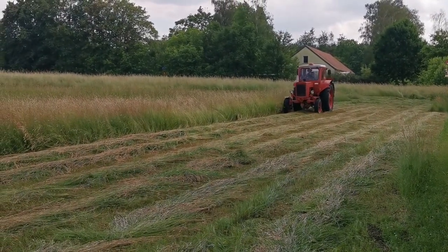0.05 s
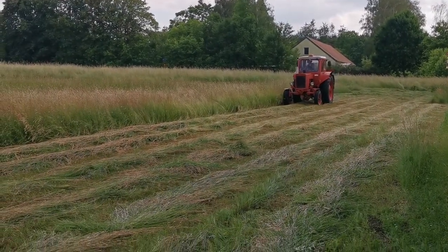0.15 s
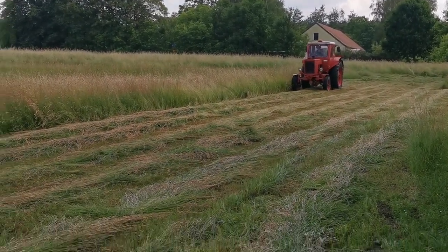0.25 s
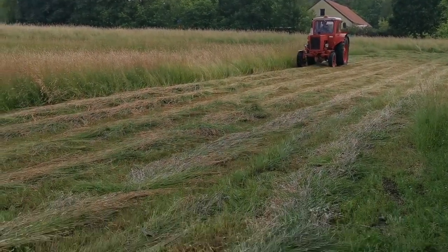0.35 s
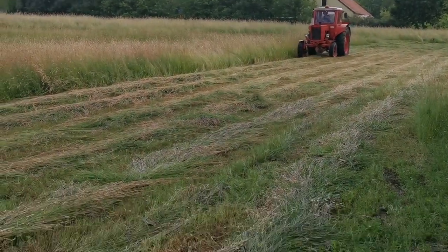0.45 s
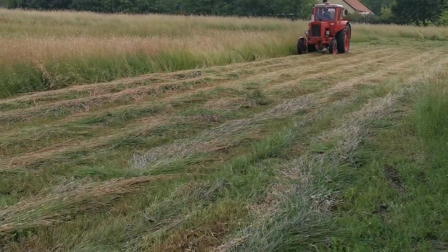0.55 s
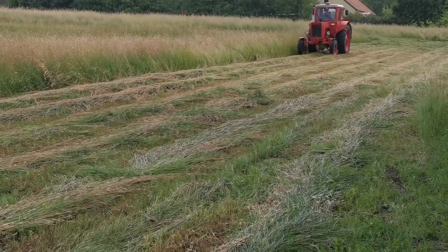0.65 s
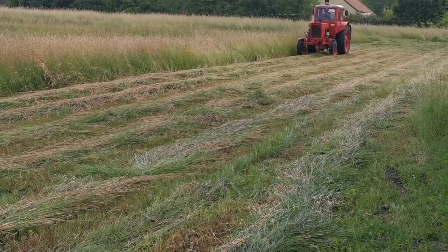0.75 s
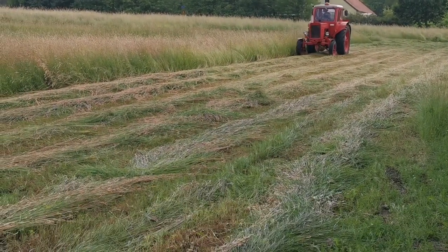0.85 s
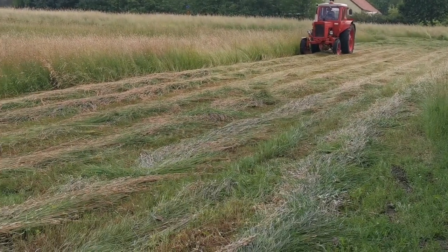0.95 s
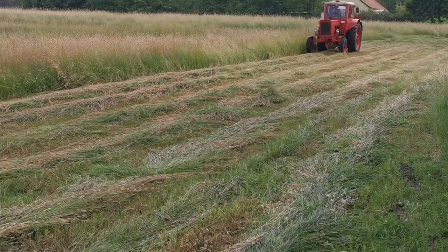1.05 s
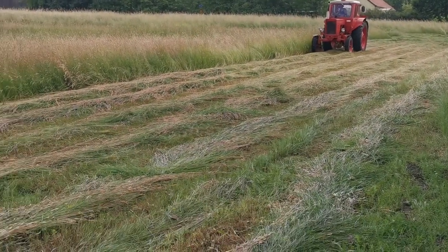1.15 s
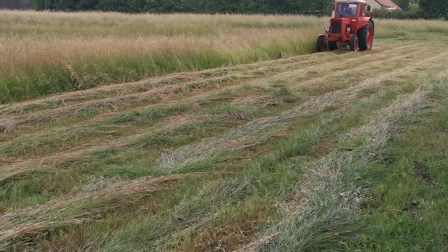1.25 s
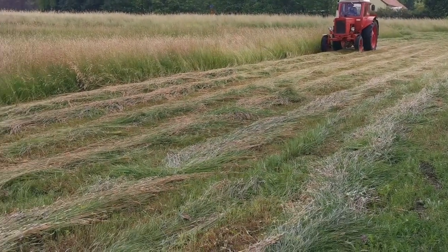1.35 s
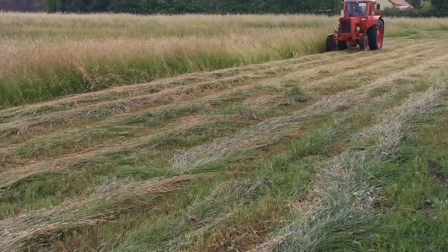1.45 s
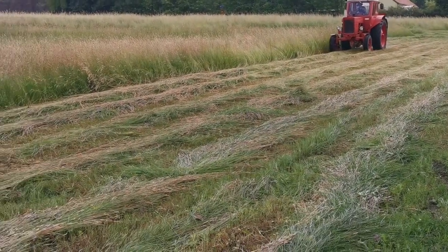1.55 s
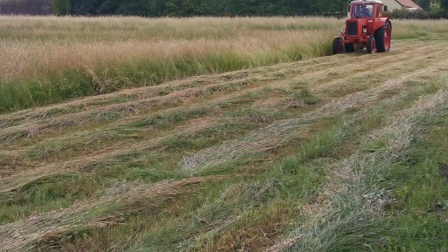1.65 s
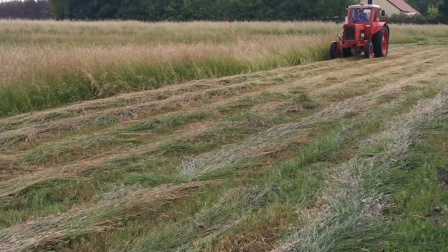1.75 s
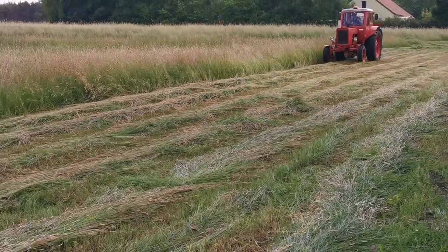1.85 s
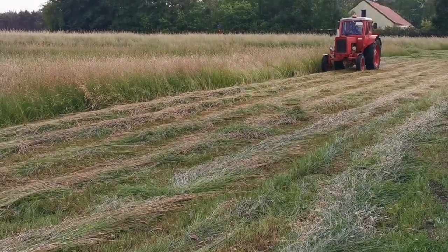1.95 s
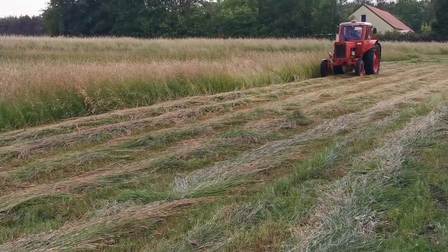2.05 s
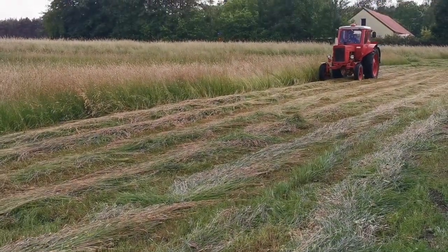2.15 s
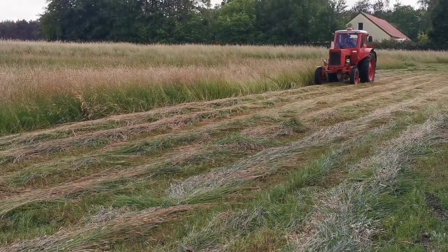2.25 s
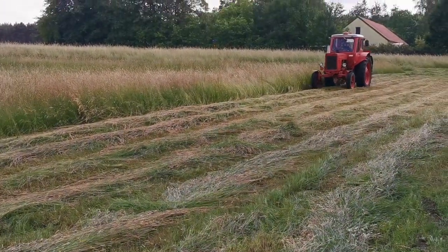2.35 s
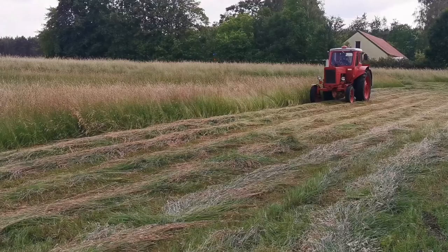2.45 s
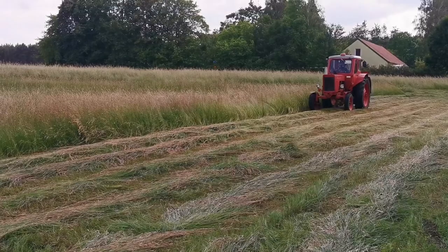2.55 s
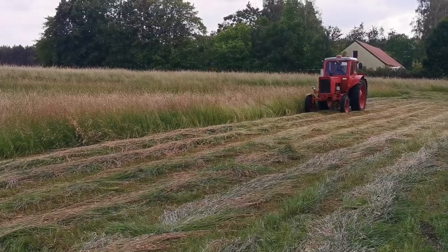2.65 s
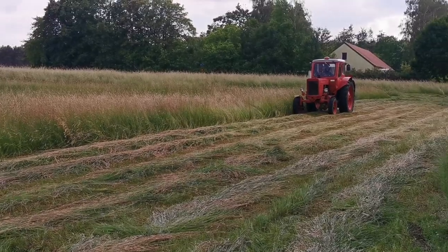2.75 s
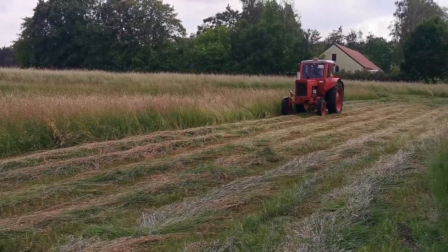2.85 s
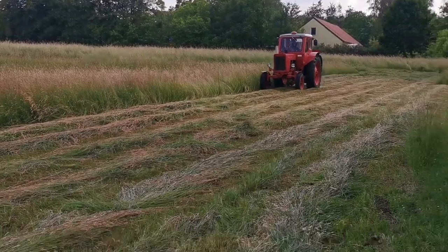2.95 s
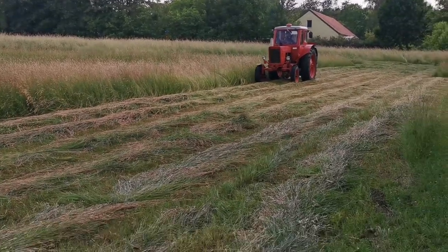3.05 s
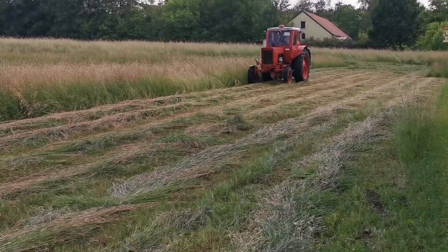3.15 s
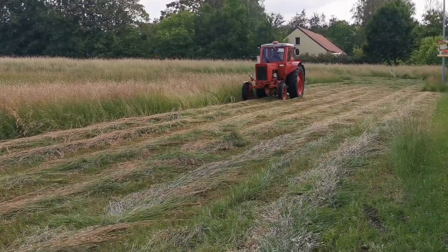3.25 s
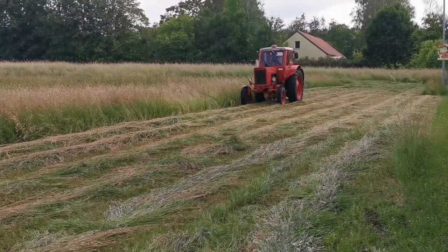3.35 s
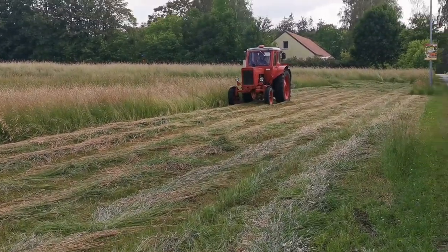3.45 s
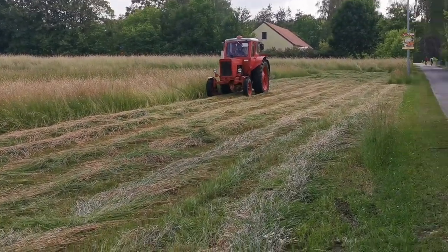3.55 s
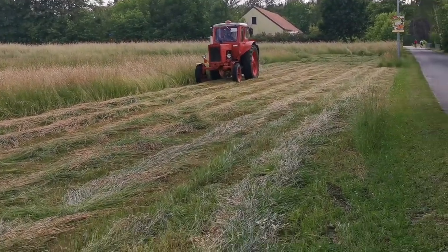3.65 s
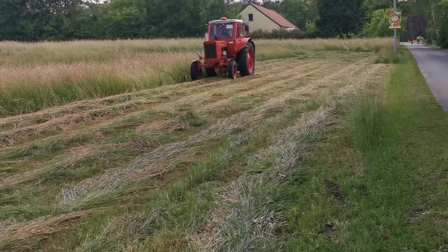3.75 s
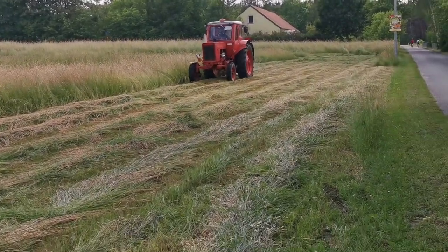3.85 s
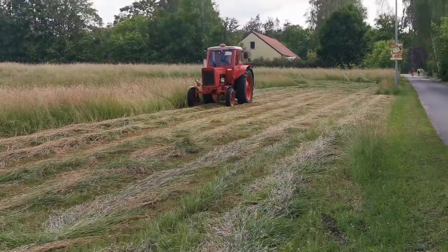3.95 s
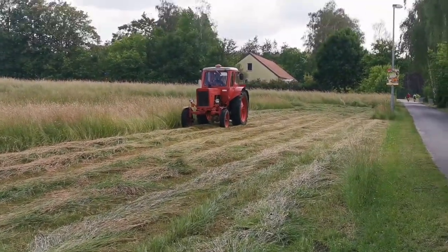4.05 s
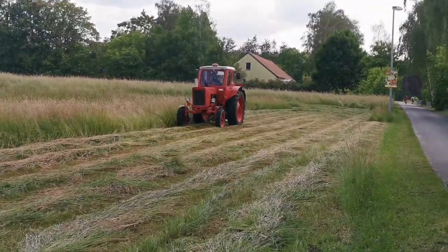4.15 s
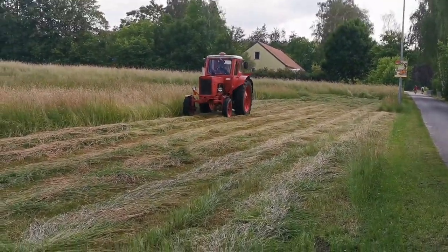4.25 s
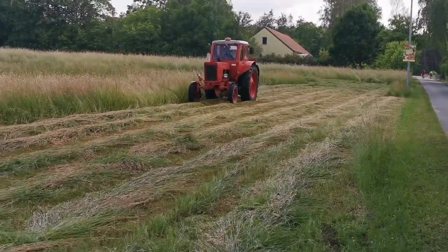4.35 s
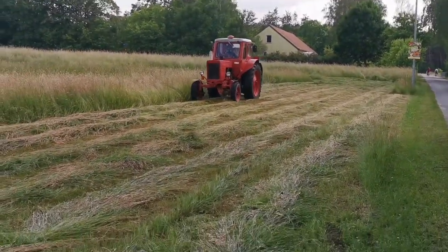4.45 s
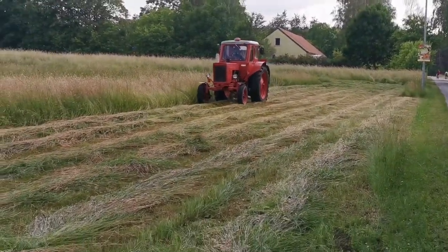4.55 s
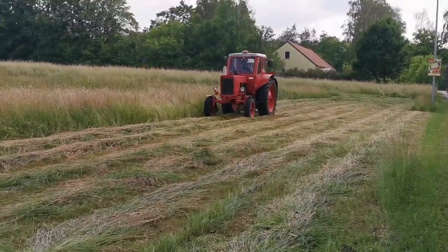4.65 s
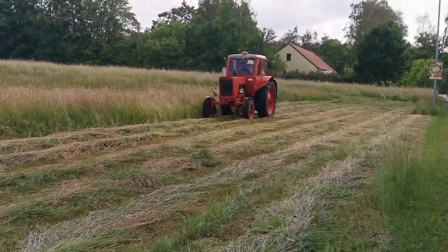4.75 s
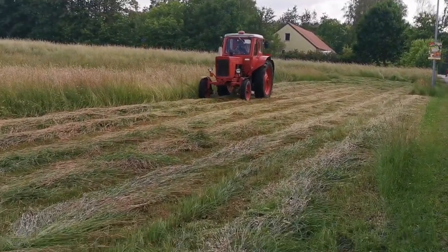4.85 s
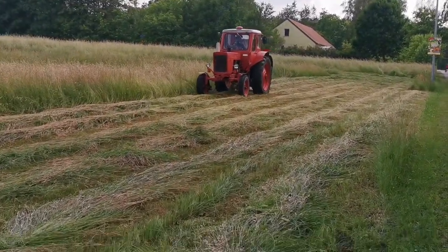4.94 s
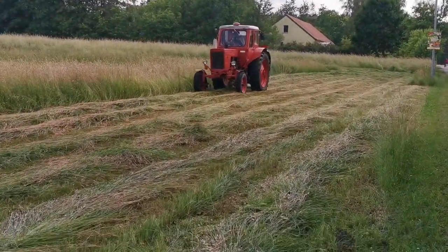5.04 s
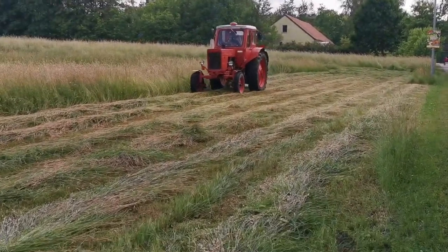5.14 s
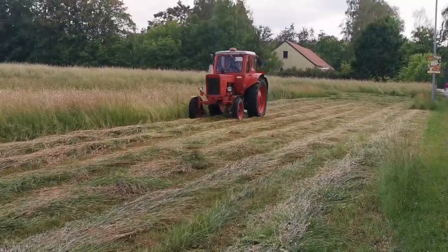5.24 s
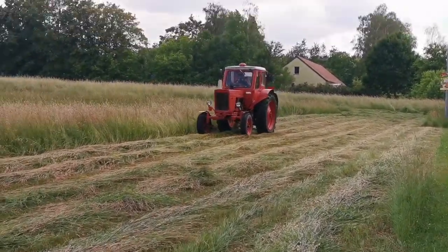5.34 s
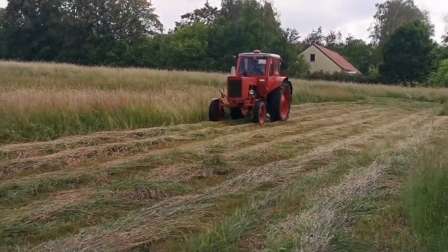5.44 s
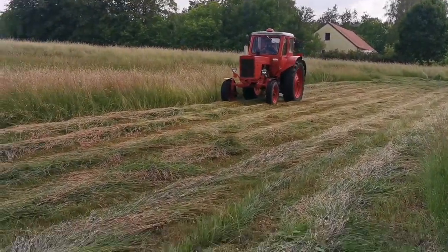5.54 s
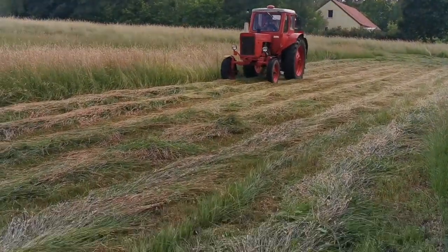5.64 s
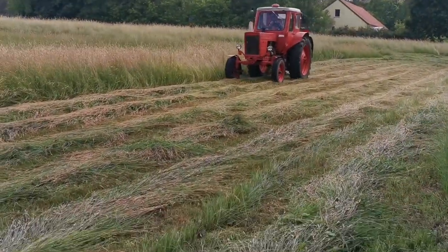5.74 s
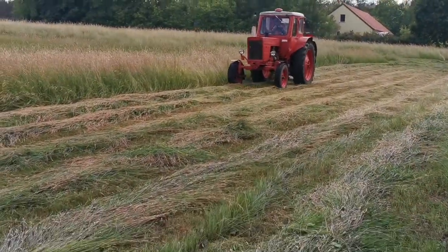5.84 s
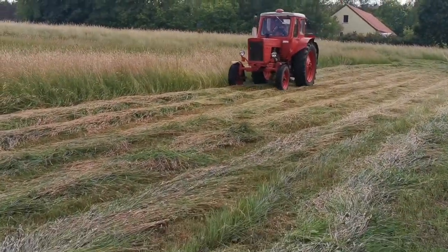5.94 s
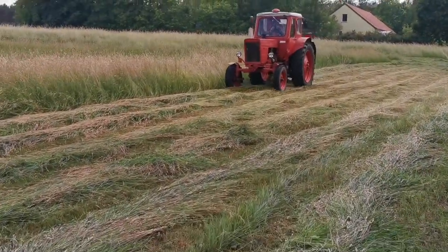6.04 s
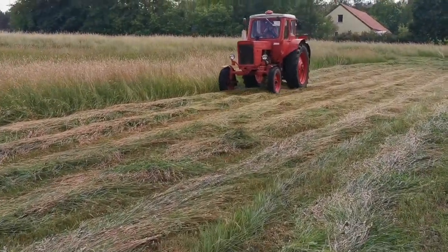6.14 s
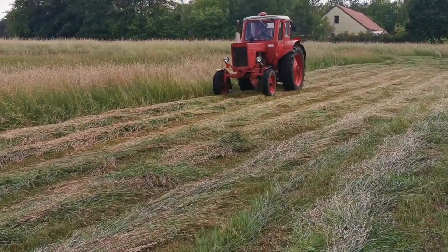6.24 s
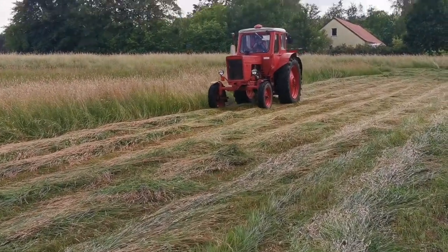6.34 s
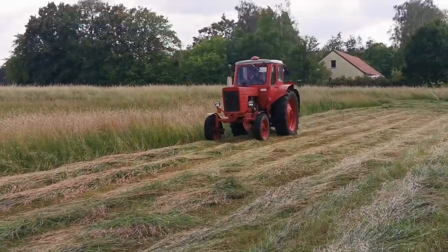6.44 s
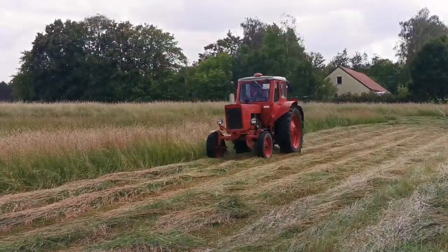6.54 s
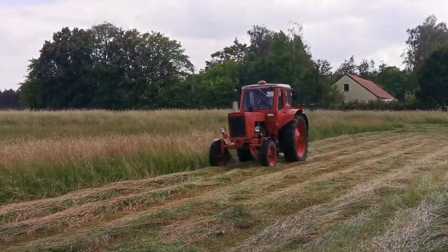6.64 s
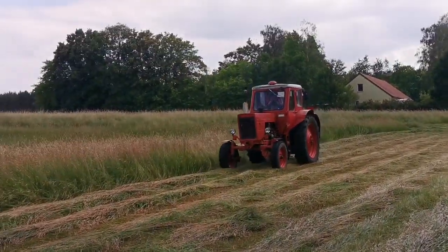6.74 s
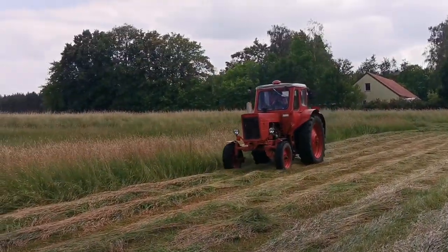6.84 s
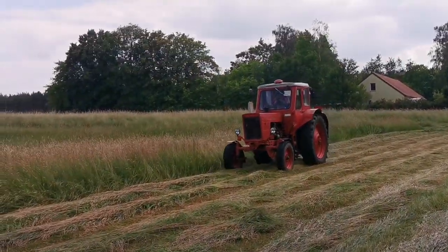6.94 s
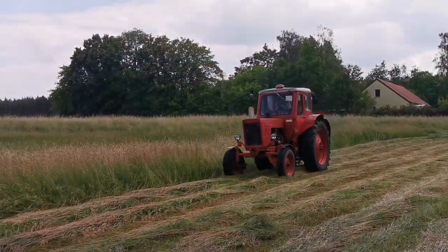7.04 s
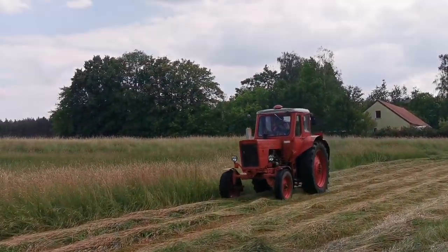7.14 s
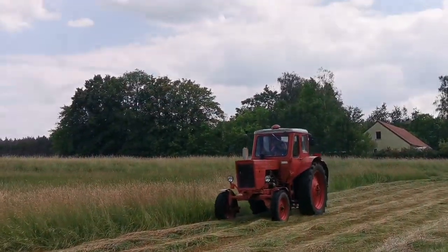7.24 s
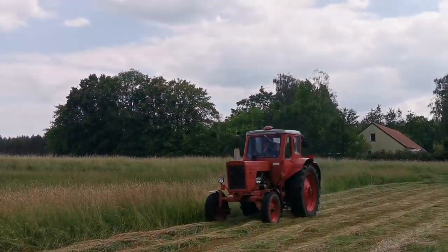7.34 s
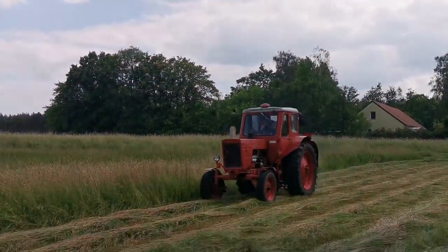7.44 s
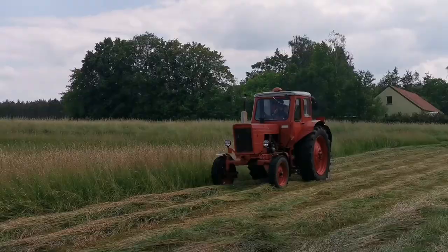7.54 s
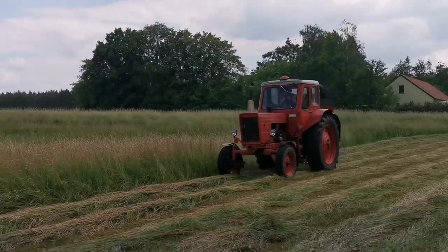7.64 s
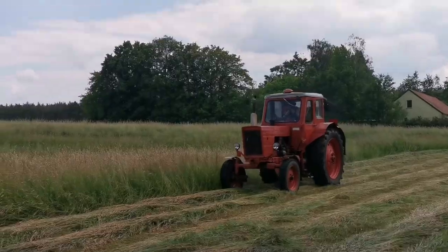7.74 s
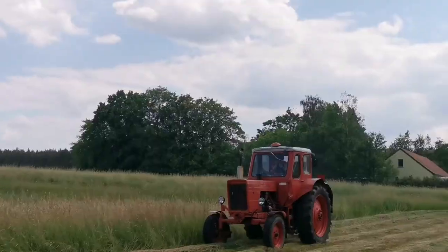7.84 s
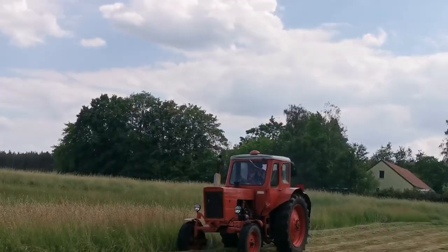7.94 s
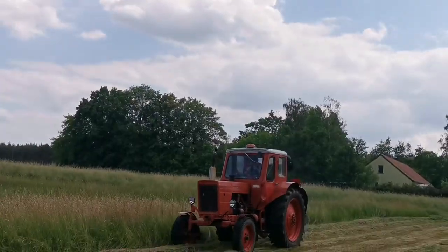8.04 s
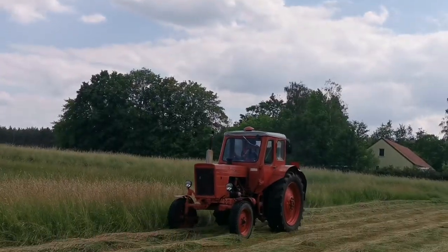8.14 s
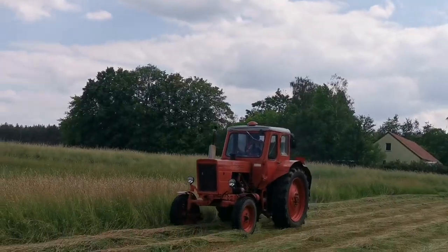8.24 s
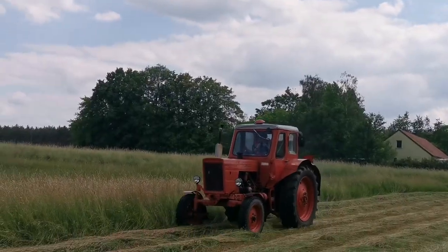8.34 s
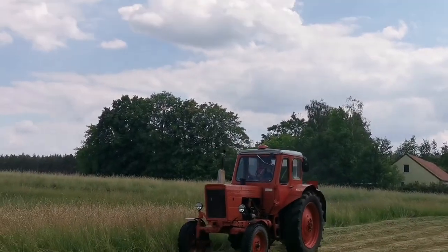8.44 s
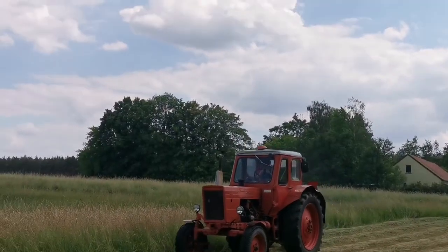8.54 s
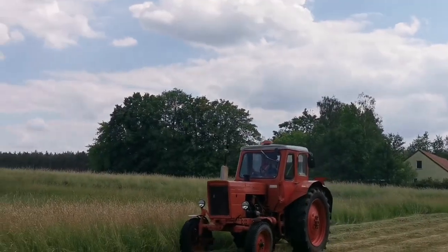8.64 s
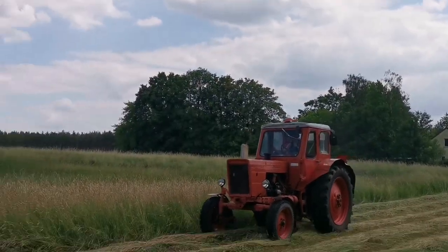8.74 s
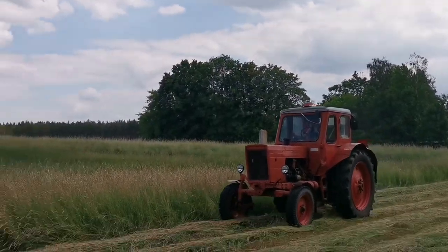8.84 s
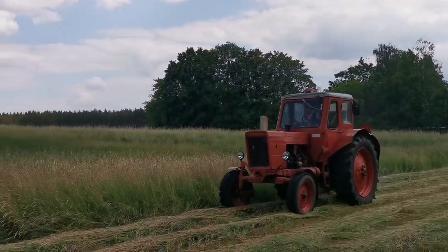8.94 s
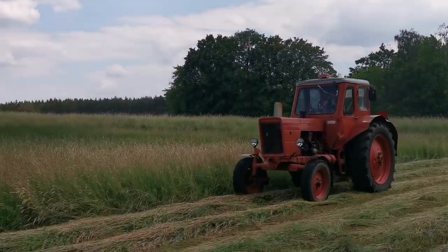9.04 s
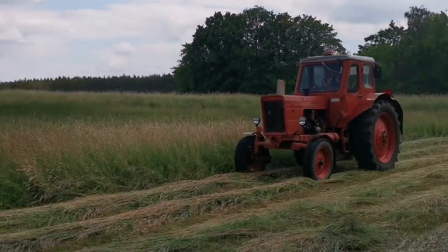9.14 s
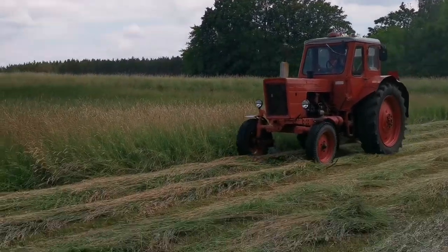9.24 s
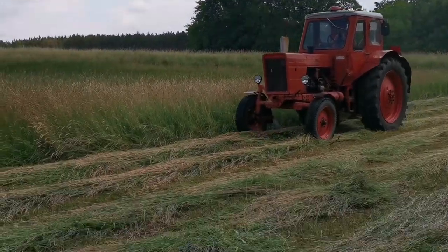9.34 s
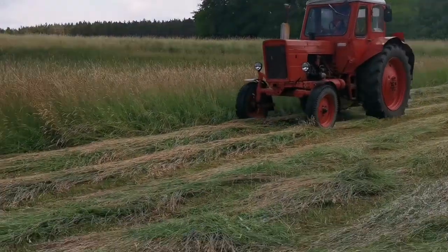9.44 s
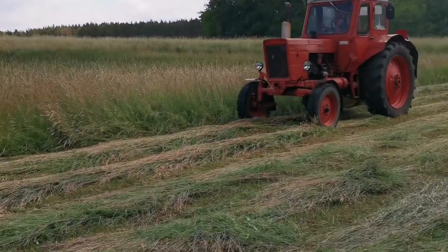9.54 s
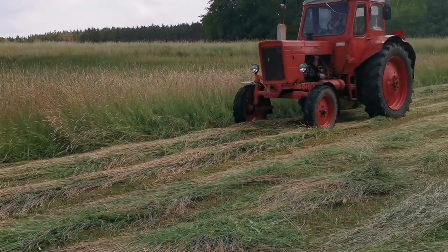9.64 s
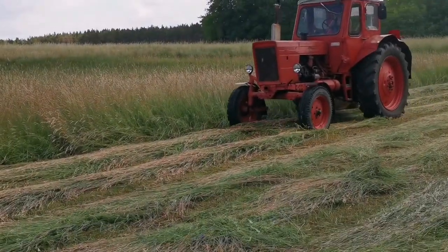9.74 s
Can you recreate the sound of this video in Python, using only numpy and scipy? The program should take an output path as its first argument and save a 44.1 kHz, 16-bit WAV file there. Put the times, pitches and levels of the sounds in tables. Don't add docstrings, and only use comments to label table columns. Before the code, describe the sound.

Continuous tractor and mower noise with almost constant engine speed: fast diesel knocking, deep buzzing exhaust, low tyre rumble, thin mechanical whines and broadband grass hiss. At first it is farther off and quieter; it swells steadily as the machine approaches. Stalks crack now and then, more strongly in the second half. Stereo phone in the open air, little reverberation, tone shifting as the phone turns and the hand slightly shades the treble.

```python
import sys
import numpy as np
from scipy import signal
from scipy.io import wavfile
from scipy.ndimage import uniform_filter1d, map_coordinates

SR = 44100
rng = np.random.default_rng(int(sys.argv[2]) if len(sys.argv) > 2 else 0)


def gain_from_decibels(decibels):
    exponent = np.asarray(decibels, float) / 20
    return 10 ** exponent


def materialize(psi):
    bounded = np.clip(np.atleast_2d(psi).T, -1, 1)
    quanta = np.round(bounded * 32767).astype(np.int16)
    wavfile.write(sys.argv[1], SR, quanta)


N = 431738

# time_s, rate_hz
FIRING_RATE = [(0, 55.78), (2.2, 55.7), (2.8, 55.42), (3.5, 55.6), (4.5, 55.84), (6.3, 55.82), (7.7, 55.52),
               (8.6, 55.6), (9.79, 55.42)]
CYCLE_HZ = 13.91
# time_s, nearness_db (block clatter), engine_load_db, cutting_load_db
DRIVE = [(0, -36.5, 0, 2), (.1, -35, -1, 0.5), (.8, -35, -1, 1), (1.2, -35, -0.5, 3),
         (1.9, -33.5, -0.5, 1.5), (2.5, -32, -2, -2.5), (2.9, -31.5, -2.5, 1), (3.6, -31.5, -2.5, 0.5),
         (4.4, -31, -3.5, 4.5), (5.1, -30, -5, 3), (5.9, -29, -3, 2.5), (6.7, -29.5, -3, 4),
         (7.4, -30, 1.5, 7.5), (8, -28.5, 0.5, 5), (8.5, -28, 0, 5.5), (9, -27.5, 0, 4),
         (9.6, -24.5, -1.5, 4), (9.79, -26, 0.5, 8)]
# time_s, stage (0 far - 3 close), phone_bearing (0-4), left_lag_samples
APPROACH = [(0, 0, 0, 3), (2.6, .05, 0, 3.2), (3, .3, 1, 2), (3.55, .6, 1.1, .5), (3.9, .9, 2, .4),
            (5.5, 1.1, 2, .4), (6.6, 1.9, 2, 1), (7.85, 2, 2, 2.2), (8.05, 2.1, 3.3, 2.5), (8.4, 2.3, 3, 3),
            (9, 2.9, 3, 4.5), (9.3, 3, 4, 6), (9.79, 3, 4, 7)]
# centre_s, length_s, level_db
RUTS = [(2.25, 0.18, -1.5), (3.2, 0.27, -1.5), (6.45, 0.3, -2.5), (8.55, 0.31, -1.5)]
# centre_s, length_s, firing_db
PULLS = [(.65, .15, -1), (.85, .25, 0), (2.9, .25, 2.5), (3.3, .4, 2), (4.15, .2, 0), (5.8, .25, 0.5),
         (6, .2, -2), (6.7, .2, 1.5), (8.1, .25, 0), (8.45, .4, -1)]
# centre_s, length_s, octave_db, gear_db, blade_db
SWATHS = [(.3, .5, 0, 0, 0.5), (1.4, .3, 0, -1, -0.5), (3.3, 1, -0.5, 2.5, 1.5), (5.1, .3, 0, -4, 0.5),
          (5.5, 0.53, -0.5, 6, 3), (6.05, .6, -1, 3, 0), (6.35, 0.24, 3.5, 1, -2.5),
          (6.7, 0.58, 6.5, 2, -1.5), (6.9, 0.17, -3, 3, 1.5), (7.2, .1, 2.5, 0, 8),
          (7.65, 0.45, -0.5, -2, -10), (7.9, 0.43, 2.5, 1, 0), (8.4, .3, -0.5, -4, 3), (8.9, .4, 0.5, 2, 1),
          (9.25, 0.22, 1.5, 0, -9)]

FIRING_DB, HISS_DB, GEAR_DB, BLADE_DB = -3, -15, -11.5, -16.5
SWAY_DB = 0.5
HISS_GROWS, GEAR_FEELS, BLADE_FEELS, RUMBLE_GROWS = 0.73, 0.77, -0.35, 0.7

# cycle_order, level_db re firing tone
UNEVEN_ORDERS = [(2, -20), (3, -19), (5, -15), (6, -16.5), (7, -16.5), (9, -17), (10, -19), (11, -14),
                 (14, -22), (15, -20), (17, -20), (18, -24), (19, -26)]
STAGGER = [(1 / 18, 0), (1 / 14, .09), (0, .62), (0, -.07)]
OCTAVE_LIFT_DB = [2.8, 4, 0.66, 2.3]
THIRD_DB = [-9, -13, -16, -23]

# crank_share (0-1), thud_db, clack_db, tick_db
KNOCKS = [(.062, 1, -2, 4), (.105, 0, -12, -4), (.195, -8, 2, -8), (.305, -1, 4, -1), (.375, -3, 1, -4),
          (.42, -8, -2, -9), (.555, 2, 1, -4), (.583, -3, 5, -2), (.625, 0, -2, -6), (.77, 3, 1, -12),
          (.825, -4, 3, -5), (.88, -6, 1, -12), (.925, 3, -4, -12)]
# crank_share (0-1), note_hz, far_db, midway_db, close_db
PINGS = [(.035, 490, -16, -14, -16), (.045, 570, -18, -16, -16), (.15, 490, -23, -18, -22),
         (.19, 570, -24, -20, -21), (.535, 780, -16, -14, -15), (.745, 780, -17, -14, -12),
         (.92, 780, -16, -16, -19), (.19, 1160, -26, -17, -13), (.565, 1160, -19, -11, -7),
         (.82, 1160, -13, -18, -22), (.265, 1350, -15, -14, -16), (.78, 1350, -18, -15, -22),
         (.3, 1480, -9, -13, -22), (.57, 1480, -16, -15, -21), (.82, 1480, -13, -15, -19),
         (.03, 2040, -22, -14, -16), (.305, 2040, -20, -12, -16), (.565, 2040, -7, -11, -18),
         (.305, 2300, -14, -10, -14), (.555, 2300, -15, -15, -11), (.815, 2300, -13, -12, -17)]
# note_hz, t60_s
CASTINGS = [(490, .04), (570, .035), (780, .025), (1160, .028), (1350, .033), (1480, .038), (2040, .018),
            (2300, .015)]
# centre_hz, width_hz, gain_db
PANELS = [(872, 38, 5.5), (1400, 31, 2), (1860, 230, -0.5), (1230, 52, 7.5)]
# start_s, peak_db, note_hz
STROKES = [(1.2361, -23, 1470), (3.1258, -19, 2090), (3.2675, -22, 1480), (3.5384, -20, 1470),
           (4.4438, -20, 2030), (4.4907, -18, 2030), (4.6334, -19, 1960), (4.7037, -19, 1990),
           (4.8289, -20, 1480), (4.9018, -20, 1480), (5.2594, -17, 1480), (6.1399, -19, 1950),
           (6.5495, -19, 1370), (6.711, -21, 790), (6.788, -13.5, 1310), (7.07, -22, 740),
           (7.286, -20, 755), (7.3602, -17, 1220), (7.5592, -17, 1250), (7.7702, -17, 1200),
           (8.2212, -15, 1210), (8.669, -20, 790), (9.339, -19, 850)]
STROKE_DB, STROKE_T60_S = -5.5, .02

BLADE_HZ = 271.8
GEAR_RATIO = 13.345
SLIP_HZ, SLIP_TURNS = 1.51, 0.3
GEAR_LIFT_DB = [0, 0, -1.5, 3]
SECOND_DRUM_DB = [-7, -14.5, -23, -10]
# pitch_hz, level_db re clatter, unsteadiness_db, near_lift_db
WHINES = [(76.7, -22.5, 2, 0), (105.6, -24, 2, 0), (140.7, -18, 2, 0), (429.2, -28.5, 2.5, 3),
          (556.4, -25.5, 2.5, 2), (750, -24, 3, 3), (856, -19, 2, -3), (945, -27, 4, -6), (1351, -26, 3, 7),
          (1487, -21.5, 3, -3), (2013, -27, 3, -3)]
STRAY_S = .00012
# start_s, peak_db
SNAPS = [(3.1607, -31), (5.0549, -30), (5.2294, -29), (5.3837, -27), (5.6715, -31), (5.7418, -28),
         (5.7867, -28), (5.9199, -27), (5.9953, -26), (6.4398, -24), (6.8279, -15), (6.8374, -26),
         (6.8463, -17), (7.2903, -30), (7.3477, -21), (7.3946, -27), (7.6294, -23), (7.4639, -18),
         (7.7099, -28), (8.0394, -21), (8.311, -28), (8.5705, -15), (8.6877, -24), (9.0359, -20)]

JOIN_HZ, TOP_HZ = 3400, 15850
# freq_hz, left_db, right_db
FAR = [(304, 4, 7.5), (340, -2.5, -3.5), (560, -5, 3.5), (660, 5.5, 13.5), (1000, 13.5, 12.5),
       (1130, 9, -13), (1200, -7.5, 9.5), (1630, 15, 9), (1830, -11, 16), (2060, 7.5, 11), (2710, -1.5, 11),
       (3030, -3, -6), (4000, -1, 8)]
# freq_hz, left_db, right_db
MIDWAY = [(296, 7.5, 5.5), (354, -0.5, -9), (485, -1, 4), (700, 10, 15), (784, 4.5, 12), (1040, 8.5, 4),
          (1200, -6.5, 2.5), (1500, 10, 10), (1770, 2, 9.5), (2010, 11.5, 17), (2760, -1.5, 5),
          (3480, -4.5, -9), (3970, 2.5, -22)]
# freq_hz, left_db, right_db
NEAR = [(300, 4.5, 7.5), (386, 9, 2.5), (500, 2, 9.5), (700, 14.5, 18.5), (837, 9.5, 13.5), (1120, 10, 0.5),
        (1203, 5.5, 14), (1510, 10, 8), (1790, 3.5, 13.5), (1940, 9.5, 14), (2760, 6, 10.5), (3070, 2, -6),
        (4000, -2.5, -26)]
# freq_hz, left_db, right_db
CLOSE = [(300, 13.5, 12), (390, 7, 10), (460, 5, 4.5), (640, 12.5, 15), (780, 13, 14), (1000, 6.5, 8),
         (1100, 8, 8), (1360, 12, -3), (1750, 10, 1), (2160, 11, 7.5), (2570, 8, 13), (3000, 3, 0.5),
         (4100, -18, 15.5)]
# freq_hz, left_db, right_db
AIMED_AWAY = [(3170, 7, 20), (3590, 7, 12), (4100, 5, -9), (4900, 5, 7), (6100, -22, 11.5),
              (6440, 12.5, 11.5), (7400, 7.5, -6), (8500, 7.5, 6.5), (9200, -8, 11), (10700, -4, 6.5),
              (11600, -11, -2), (12400, -12, -3), (13600, -3, 2), (15200, -16, 2.5)]
# freq_hz, left_db, right_db
TURNING = [(3260, 1, 13), (3716, -13, 14.5), (4200, -1, 6), (4750, -8, 4), (5600, 7.5, 3), (6300, 1, 2),
           (7200, 4, 8), (8300, 13.5, 7), (9700, 1, 7), (10600, -1, 11), (11550, -6, -4), (12400, -6, 1),
           (13700, -7, 1), (15200, -8, 1)]
# freq_hz, left_db, right_db
FACING = [(3200, -15, 11.5), (3700, -17, 7.5), (4440, 1, -0.5), (4940, 5, 7), (5730, 6.5, -21),
          (6270, -0.5, -1.5), (6800, -4.5, 6.5), (8750, 7, 13), (9700, -12, 11), (10900, -11, 12),
          (11500, -28, 2.5), (12400, -7, 1), (13600, -3, 2.5), (15200, -8, -3)]
# freq_hz, left_db, right_db
TILTED = [(2870, 23, 23), (3700, 1, 12.5), (4220, -5, 14), (4920, 9, 9), (5400, 7, -16), (6470, 14, 11),
          (7050, 12.5, -4), (8400, 1, 3), (9700, -6, 5), (10750, -4, 8.5), (11300, -14, 5), (12400, -7, -2),
          (13600, -3, 0), (15200, -11, -3)]
# freq_hz, left_db, right_db
SIDEWAYS = [(3420, 5, 16), (3850, -16, 1), (4130, 1, 0), (4800, 12, 14.5), (5550, 10, -1), (6500, 5, 7),
            (7200, 6.5, -3), (8350, -11, 1), (9700, 1, -5), (10700, 4, -14), (11500, -14, 5.5),
            (12400, -8, 3), (13590, -3, 1), (15200, -6, -6)]
# freq_hz, likeness (0-1)
LIKENESS = [(200, .998), (600, .992), (1000, .95), (2200, .94), (3200, .9), (5000, .52), (8000, .66),
            (15000, .25)]
# freq_hz, left_minus_right_db
BASS_TILT = [(50, 5), (110, 2.5), (200, 1.5), (380, 0), (700, 3), (2000, -18.5)]
# centre_s, length_s, centre_hz, width_hz, gain_db
COLOUR_SWELLS = [(.95, 0.54, 2150, 400, 3.5), (1.8, 0.34, 950, 300, 4.5), (2.7, 0.54, 855, 300, 2),
                 (3.3, 1.2, 2430, 250, 4), (3.405, 0.36, 930, 199, 7), (3.5, .5, 4200, 500, 6.5),
                 (3.8, 1.2, 438, 150, 0), (3.9, 1.5, 2830, 250, 7), (4, 1.2, 7400, 1200, -3),
                 (4.1, 2, 1200, 198, 10), (4.4, 0.66, 2010, 300, 4), (4.5, 0.51, 1510, 200, -5),
                 (6.7, 0.33, 2600, 250, 6), (7.102, 0.58, 800, 300, 2), (5.103, 0.98, 2290, 250, 6),
                 (5.1, 0.83, 1130, 300, 2.5), (6.007, 0.94, 2920, 1420, -5), (6.1, .6, 480, 200, 2),
                 (6.1, 1, 7240, 1200, 7), (6.2, 1.7, 1510, 120, 4.5), (6.8, 3, 1365, 120, 8.5),
                 (7.5, 0.9, 1180, 200, 2.5), (8.193, 0.68, 1530, 150, 8.5), (8.197, 0.56, 1320, 245, -1.5),
                 (8.2, 0.44, 2320, 700, 1.5), (8.2, 0.74, 8000, 1500, 7), (8.6, 2, 465, 150, 1),
                 (8.998, 0.59, 4800, 1000, 6.5), (9.3, 1.1, 2560, 250, -6), (9.3, 1, 7900, 1500, -4),
                 (3, 0.54, 1440, 300, 1.5), (6.3, 0.43, 2060, 400, 2.5), (6.902, .25, 1360, 400, -4),
                 (4.4, 0.44, 1370, 250, 1.5), (9.4, .9, 1480, 200, -7), (9.5, .7, 3750, 250, -10),
                 (9.7, .3, 1150, 300, 3)]
# freq_hz, density_db_per_hz
RUMBLE = [(20, 2), (45, -16), (70, 2), (95, -2), (200, 1.5), (270, -3), (330, -12), (450, -59)]

# centre_s, length_s, share_lost (0-1)
SHADES = [(3.45, .15, .35), (3.75, .2, .75), (4, .25, .7), (4.27, .18, .8), (5.05, .22, .55),
          (5.65, .12, .3), (8.25, .15, .4), (9.05, .1, .3)]
SHADE_HZ = 13400
FLINCH_S, FLINCH_DB, RECOVER_S = 6.832, -2, 0.12


def exhaust(cycle, firing_db, octave_db, stage):
    def turns(order):
        slope_turns, offset_turns = STAGGER[order % 4]
        return order * cycle + (order - 4) * slope_turns + offset_turns

    third_db = firing_db + by_stage(THIRD_DB, stage) + wobble(3)
    out = tone(turns(4), firing_db, 56) + tone(turns(8), octave_db, 111)
    out += tone(turns(12), third_db, 167)
    for order, level_db in UNEVEN_ORDERS:
        out += tone(turns(order), firing_db + level_db + 0.69 * wobble(2.3), 14 * order)
    return out


def block(cycle, clatter_db, stage, lag):
    shares, thud_db, clack_db, _ = np.transpose(KNOCKS)
    phase_index = (cycle % 1 * SR / 14).astype(int)
    habit = rng.standard_normal((2, 4096))[:, phase_index]
    fresh, steady = rng.standard_normal((2, 2, N))
    strike = .85 * habit + .5 * fresh
    lowpass = signal.butter(4, 1050, fs=SR, output="sos")
    dull = signal.sosfiltfilt(lowpass, strike)
    bright = strike - dull
    knocks = beats(cycle, shares, thud_db, .022, 1) * dull
    knocks += beats(cycle, shares, clack_db, .017, 1.5) * bright
    knocks[0] += gain_from_decibels(7) * castings(cycle, stage)
    roar = gain_from_decibels(-6.5) * steady

    def band(hz):
        panel_db = sum(db / (1 + ((hz - c) / w * 2) ** 2) for c, w, db in PANELS)
        highpass = (hz / 300) ** 3 / np.sqrt(1 + (hz / 300) ** 6)
        return gain_from_decibels(panel_db) * highpass / np.sqrt(1 + (hz / JOIN_HZ) ** 12)

    colours = [FAR, MIDWAY, NEAR, CLOSE]
    shaped = at_ports(knocks + roar, colours, stage, lag, band, patchy_db=.8)
    return gain_from_decibels(clatter_db - 1.46) * shaped


def castings(cycle, stage):
    shares, notes, *levels = np.transpose(PINGS)
    mid_turn = np.arange(int(cycle[-1]) + 2) - .5
    turn_stage = stage[np.minimum(np.searchsorted(cycle, mid_turn), N - 1)]
    level_db = np.transpose([by_stage(row, turn_stage * 2 / 3) for row in np.transpose(levels)])
    out = np.zeros(N)
    for hz, t60_s in CASTINGS:
        mine = notes == hz
        turns = round(hz / 13.9) * cycle + .28 * wobble(12)
        envelope = beats(cycle, shares[mine], level_db[:, mine], t60_s, 1.3)
        out += envelope * np.sin(2 * np.pi * turns)
    return out


def strokes():
    out = np.zeros(N + SR)
    t = np.arange(SR // 30) / SR
    for start_s, peak_db, hz in STROKES:
        ring = np.sin(2 * np.pi * hz * t) * (1 - np.exp(-t / 0.00038))
        decay = gain_from_decibels(peak_db + STROKE_DB - 60 * t / STROKE_T60_S)
        out[round(start_s * SR):][:len(t)] += decay * ring
    return out[:N] * gain_from_decibels([[-1], [1.5]])


def drums(cycle, gear_db, blade_db, stage):
    t = np.arange(N) / SR
    turns = BLADE_HZ * cycle / CYCLE_HZ + 0.042 * wobble(4.4)
    second_turns = turns - SLIP_HZ * t + SLIP_TURNS
    gear = tone(GEAR_RATIO * cycle, gear_db, 186)
    first = tone(turns, blade_db + .7 * wobble(3), 290)
    second = tone(second_turns, blade_db + by_stage(SECOND_DRUM_DB, stage), 290)
    return gear + first + second


def whines(cycle, clatter_db, stage):
    out = np.zeros((2, N))
    near = by_stage([0, 0, 1, 0], stage)
    for hz, level_db, shaky_db, lift_db in WHINES:
        turns = hz * (cycle / CYCLE_HZ + STRAY_S * wobble(3))
        whine_db = clatter_db + level_db + lift_db * near + shaky_db * wobble(5)
        out += tone(turns, whine_db, hz)
    return out


def grass(cycle, hiss_db, bearing, lag):
    shares, *_, tick_db = np.transpose(KNOCKS)
    swish = gain_from_decibels(0.17 * wobble(40)) + 1.04 * beats(cycle, shares, tick_db, 0.015, 4.8)
    hiss = swish * rng.standard_normal((2, N))
    snap_decay = gain_from_decibels(-60 * np.arange(80) / SR / .002)
    for start_s, peak_db in SNAPS:
        i = round((start_s + 0.00103) * SR)
        crack = snap_decay * np.diff(rng.standard_normal(81))
        crack /= np.linalg.norm(crack)
        hiss[:, i:i + 80] += gain_from_decibels(peak_db - hiss_db[i] + 7) * crack * [[1], [-.8]]

    def band(hz):
        return (hz / JOIN_HZ) ** 6 / np.sqrt(1 + (hz / JOIN_HZ) ** 12) * (hz < TOP_HZ)

    colours = [AIMED_AWAY, TURNING, FACING, TILTED, SIDEWAYS]
    return gain_from_decibels(hiss_db) * at_ports(hiss, colours, bearing, lag, band, patchy_db=1.4)


def rumble(clatter_db, lag):
    colour = []
    for hz, db in RUMBLE:
        tilt_db = along(BASS_TILT, hz)[0] / 2
        colour.append((hz, db + tilt_db, db - tilt_db))
    noise = rng.standard_normal((2, N))
    low = at_ports(noise, [colour], 0 * lag, lag, np.ones_like, patchy_db=1.0)
    mean_db = clatter_db.mean()
    return gain_from_decibels(mean_db + RUMBLE_GROWS * (clatter_db - mean_db) + 8.5) * low


def tone(turns, db, hz):
    tilt_db = along(BASS_TILT, hz)[0] / 2
    return np.sqrt(2) * gain_from_decibels(db) * np.cos(2 * np.pi * turns) * gain_from_decibels([[tilt_db], [-tilt_db]])


def beats(cycle, shares, levels_db, t60_s, scatter_db):
    turn = np.arange(int(cycle[-1]) + 2)[:, None] - 1 + np.asarray(shares)
    chance = rng.standard_normal((*turn.shape, 2))
    size = gain_from_decibels(np.asarray(levels_db) + scatter_db * chance[..., 0])
    at = np.searchsorted(cycle, (turn + .002 * chance[..., 1]).ravel())
    t = np.arange(1, SR // 30) / SR
    shape = gain_from_decibels(-60 * t / t60_s) * (1 - np.exp(-t / 0.0026))
    blows = np.bincount(at, size.ravel() * (turn.ravel() > 0), N + 1)
    return signal.oaconvolve(blows, shape)[:N]


def at_ports(pair, colours, place, lag, band, patchy_db):
    hz, t, z = signal.stft(pair / np.std(pair), SR, nperseg=1024)
    at = np.minimum((t * SR).astype(int), N - 1)
    angle = np.arccos(np.clip(along(LIKENESS, hz).T, 0, 1)) / 2
    mid, side = z * [np.cos(angle), np.sin(angle)] * band(hz[:, None])
    where = np.clip(place[at], 0, len(colours) - 1)
    share = np.clip(1 - abs(where - np.arange(len(colours))[:, None]), 0, 1)
    colour_db = np.array([along(c, hz) for c in colours])
    db = np.einsum("kcf,kt->cft", colour_db, share) + colour_swells(hz, t)
    field = rng.standard_normal(db.shape) + 2 * rng.standard_normal(db.shape[1:])
    field = uniform_filter1d(field, size=7, axis=1)
    field = uniform_filter1d(field, size=14, axis=2)
    gain = gain_from_decibels(db + patchy_db * field / np.std(field))
    delay = np.exp(-1j * np.pi * hz[:, None] * lag[at] / SR)
    heard = gain * [(mid + side) * delay, (mid - side) / delay]
    return signal.istft(heard, SR, nperseg=1024)[1][:, :N]


def colour_swells(hz, t):
    s, length_s, centre_hz, width_hz, db = np.transpose(COLOUR_SWELLS)
    spectrum = db * np.exp(-(2 * (hz[:, None] - centre_hz) / width_hz) ** 2)
    return spectrum @ np.exp(-(2 * (t - s[:, None]) / length_s[:, None]) ** 2)


def along(points, hz):
    f, *cols = np.transpose(points)
    return np.array([np.interp(np.log(hz + 1), np.log(f + 1), c) for c in cols])


def curves(rows):
    s, *cols = np.transpose(rows)
    return [np.interp(np.arange(N) / SR, s, c) for c in cols]


def swells(rows):
    s, length_s, *cols = np.transpose(rows)
    coarse_s = np.arange(0, N + 64, 64) / SR
    bells = np.exp(-(2 * (coarse_s - s[:, None]) / length_s[:, None]) ** 2)
    return [np.interp(np.arange(N) / SR, coarse_s, c @ bells) for c in cols]


def by_stage(values, stage):
    return np.interp(stage, np.arange(len(values)), values)


def wobble(rate_hz):
    fine = np.arange(0, N * rate_hz / SR + 1, 1 / 8)
    knots = rng.standard_normal(len(fine) // 8 + 4)
    smooth = map_coordinates(knots, [fine], order=2)
    return np.interp(np.arange(N) * rate_hz / SR, fine, smooth)


def scene():
    cycle = np.cumsum(curves(FIRING_RATE)[0]) / SR / 4 + .07
    near_db, load_db, cut_db = curves(DRIVE)
    stage, bearing, lag = curves(APPROACH)
    bark_db, bite_db, sing_db = swells(SWATHS)
    rut_db = swells(RUTS)[0]

    clatter_db = near_db + rut_db + SWAY_DB * wobble(4.6)
    firing_db = near_db + 0.4 * rut_db + load_db + FIRING_DB
    octave_db = firing_db + by_stage(OCTAVE_LIFT_DB, stage) + bark_db + 0.5 * wobble(5.5)
    pulled_db = firing_db + swells(PULLS)[0] + 0.4 * wobble(3.6)
    gear_db = near_db + GEAR_FEELS * load_db + by_stage(GEAR_LIFT_DB, stage)
    gear_db += bite_db + GEAR_DB + 0.6 * wobble(3)
    blade_db = near_db + BLADE_FEELS * cut_db + BLADE_DB + sing_db
    mean_db = near_db.mean()
    hiss_db = mean_db + HISS_GROWS * (near_db - mean_db) + cut_db + HISS_DB + 0.38 * wobble(2.6)

    engine = exhaust(cycle, pulled_db, octave_db, stage)
    engine += block(cycle, clatter_db, stage, lag) + strokes()
    mower = drums(cycle, gear_db, blade_db, stage) + whines(cycle, clatter_db, stage)
    mower += grass(cycle, hiss_db, bearing, lag)
    return engine + mower + rumble(clatter_db, lag)


def band_limit(x):
    return signal.sosfilt(signal.butter(12, 15835, fs=SR, output="sos"), x)


def record(dry):
    highpass = signal.butter(6, SHADE_HZ, "high", fs=SR, output="sos")
    top = signal.sosfiltfilt(highpass, dry)
    shaded = dry - np.clip(swells(SHADES)[0], 0, 1) * top
    since_s = np.arange(N) / SR - FLINCH_S
    gain = gain_from_decibels(FLINCH_DB * (since_s > 0) * np.exp(-abs(since_s) / RECOVER_S))
    return band_limit(gain * shaded)


dry = scene()
out = record(dry)
materialize(out)
```